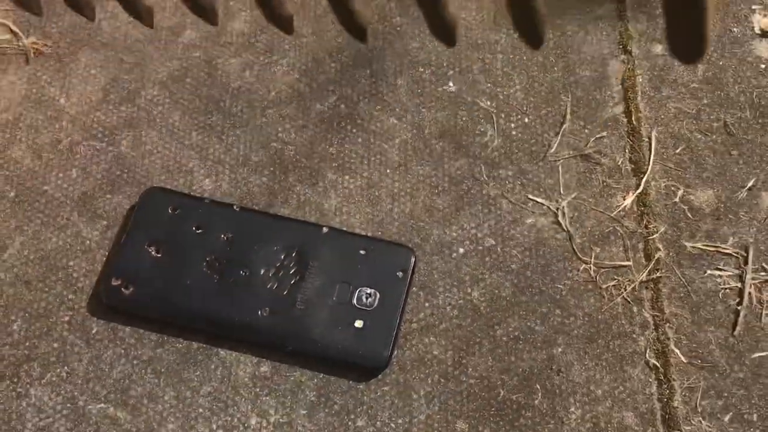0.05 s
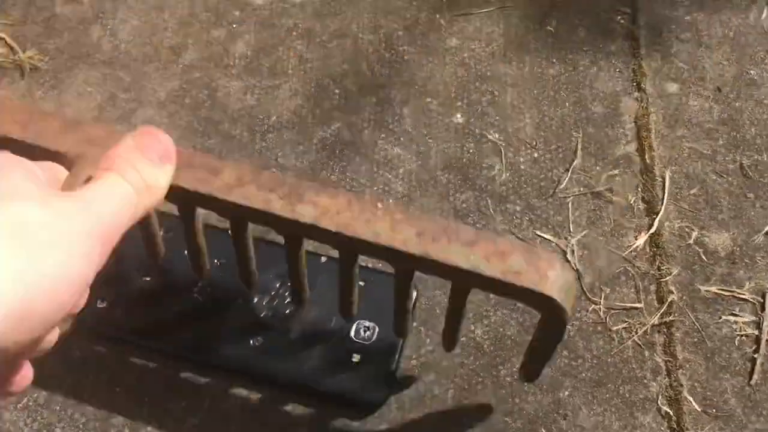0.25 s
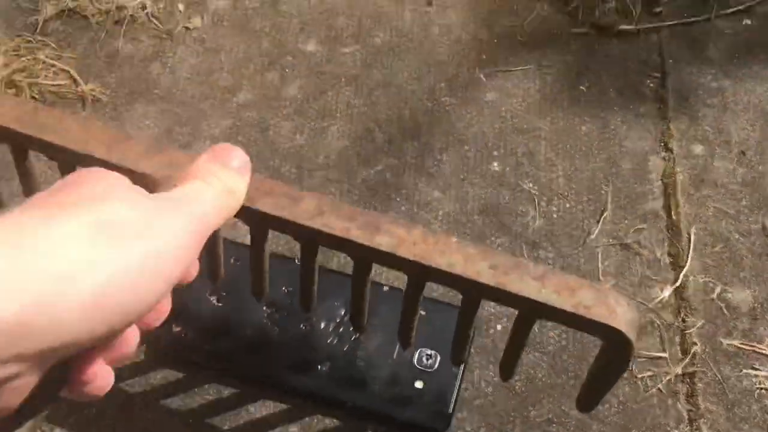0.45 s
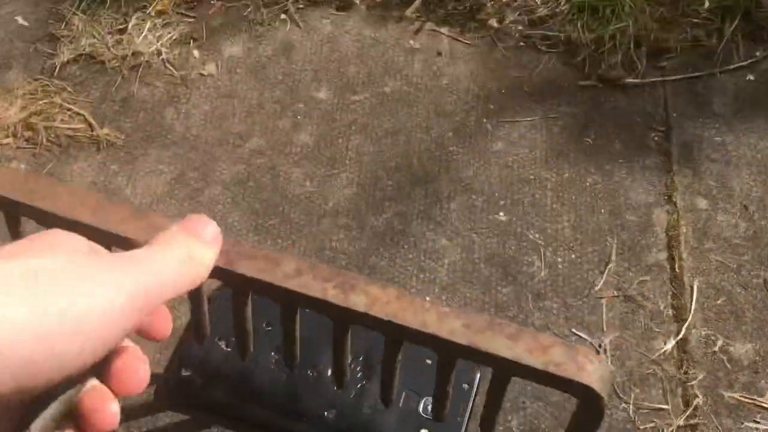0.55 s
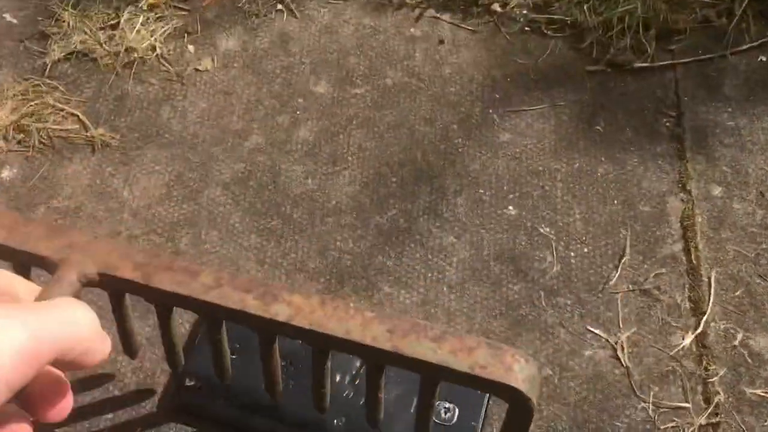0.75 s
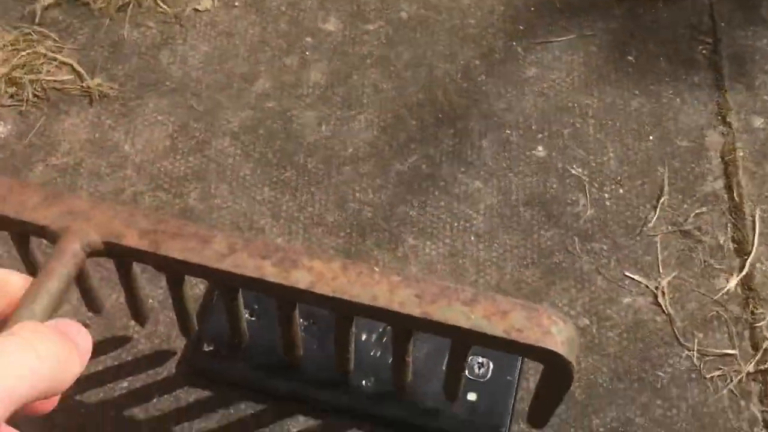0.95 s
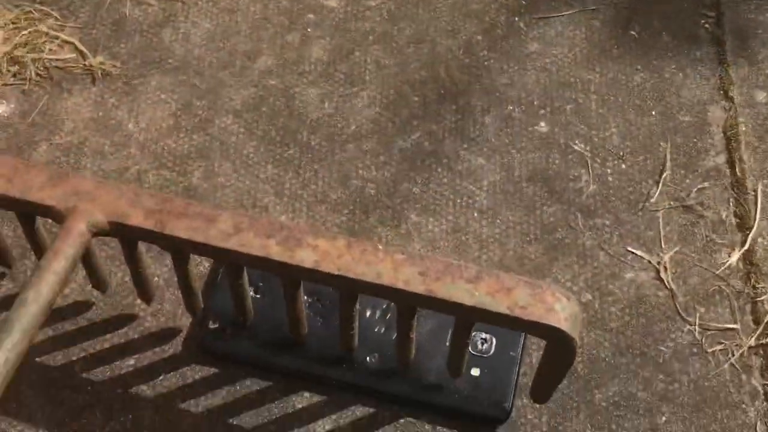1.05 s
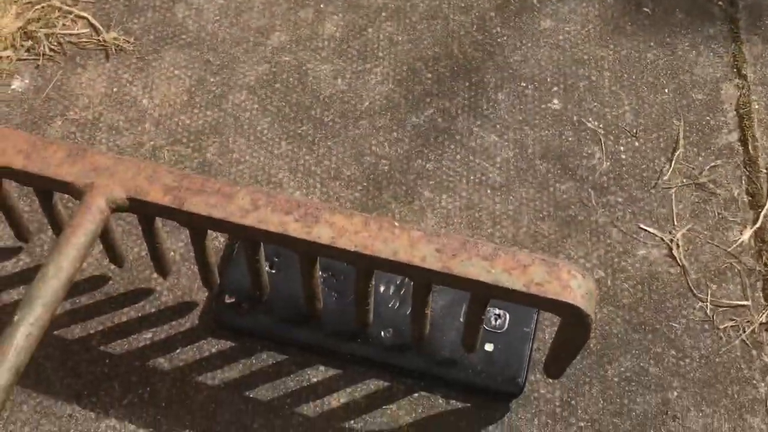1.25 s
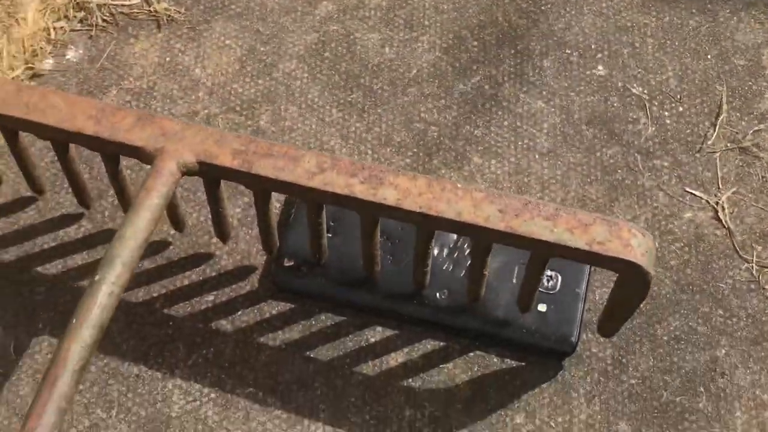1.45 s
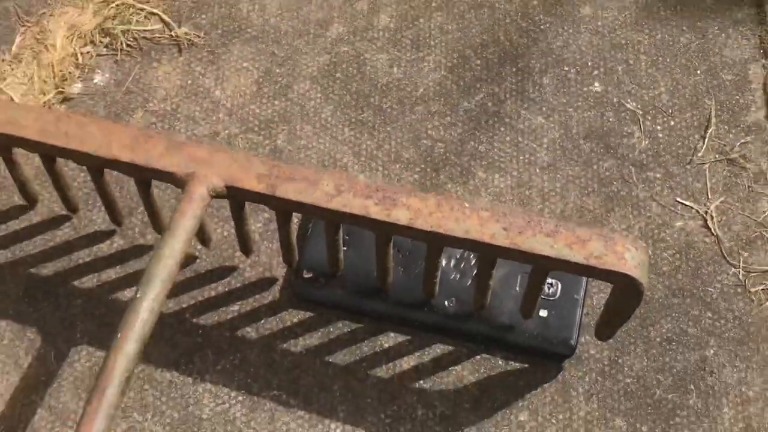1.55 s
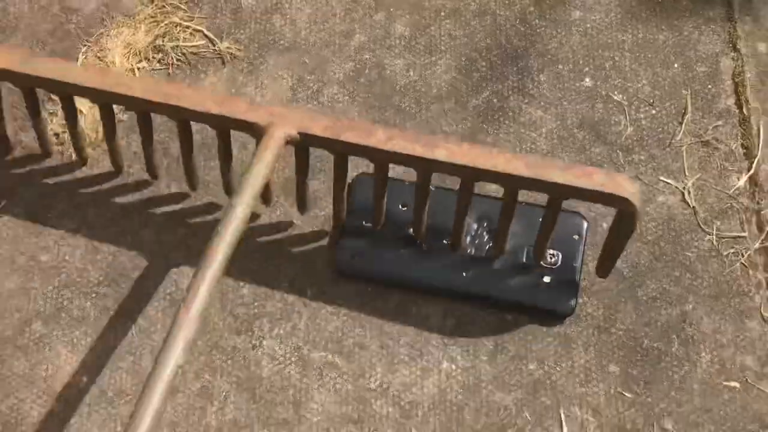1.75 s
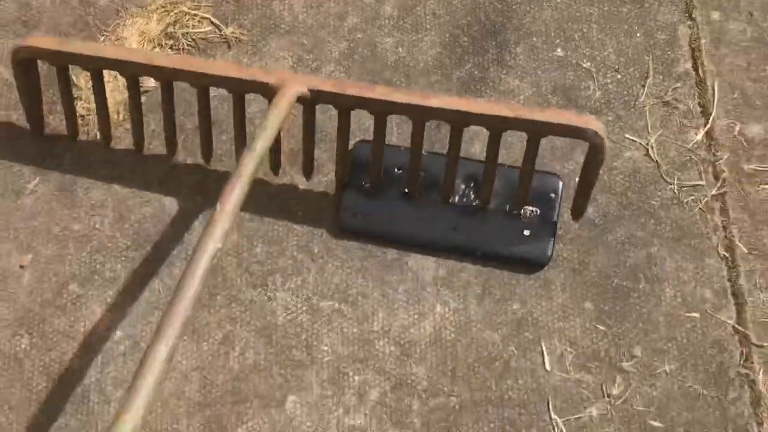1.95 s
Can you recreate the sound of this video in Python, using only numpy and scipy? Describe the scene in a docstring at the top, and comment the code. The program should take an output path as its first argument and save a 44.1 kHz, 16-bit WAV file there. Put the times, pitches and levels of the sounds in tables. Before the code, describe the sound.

One loud rattling clank of a steel rake, followed by two gritty drags across concrete.

```python
"""Outdoors on a concrete slab: a steel garden rake is set down on a phone lying there, right at its mic.
The head lands with one loud rattling clank, then drags twice: it grinds over the rough concrete, grit
snaps under it and single tines ping as they slip off an edge. The handle bumps, the phone's case takes
two dull knocks, and the head judders in the second drag. A faint ring hangs between the drags, over a
low outdoor hum and a faint hiss."""
import sys
import numpy as np
from scipy import signal
from scipy.fft import rfft, irfft
from scipy.io import wavfile

SR = 44100
rng = np.random.default_rng(int(sys.argv[2]) if len(sys.argv) > 2 else 0)


def file_out(sig):
    """Save sig as 16-bit WAV at sys.argv[1]."""
    # one column per channel
    cols = np.atleast_2d(sig).T
    # limit, then scale
    lim = np.clip(cols, -1, 1)
    pcm = np.round(lim * 32767).astype(np.int16)
    wavfile.write(sys.argv[1], SR, pcm)


N = 88200

GRIND_PER_S, GRIND_SPREAD_DB = 5000, 5  # tiny catches of steel on concrete
# spectrum of cracking grit: f/Hz, density/dB
GRIT_SPECTRUM = [(100, -36), (1500, -4), (3000, -4.5), (5500, 0), (7500, -6), (9000, -5), (10500, -9),
                 (13000, -0.5), (16000, -8)]
# spectrum of the head in the scuff and the first drag: f/Hz, density/dB
FIRST_SPECTRUM = [(40, -27.5), (140, -7), (300, -3.5), (550, -0.5), (750, -1.5), (1100, -3.5), (1650, 0.5),
                  (2100, -14), (2800, -18.5), (3600, -28.5), (8000, -29.5), (16000, -59)]
# its resonances there: f/Hz, width/Hz, boost/dB
FIRST_RESONANCES = [(367, 13, 9.5), (556.4, 22, 13.5), (1465, 93, 8.2), (1700, 27, 6.9), (2710, 49, 17),
                    (3850, 30, 13)]


def amp(db):
    return 10 ** (np.asarray(db) / 20)


def unit_rms(x):
    return x / np.sqrt(np.mean(x ** 2) + 1e-20)


def at_hz(points, hz):
    """Interpolates a table on a log-frequency axis."""
    f, value = np.transpose(points)
    return np.interp(np.log(hz + 1), np.log(f + 1), value)


def add(mix, start_s, sound):
    part = mix[round(start_s * SR):][:len(sound)]
    part += sound[:len(part)]


def decay(t, t60):
    return np.exp(-np.log(1000) * t / np.maximum(t60, 1e-3))


def envelope(curve):
    """Gain over the scene from rows of t/s, level/dB; silent outside them."""
    s, db = np.transpose(curve)
    return amp(np.interp(np.arange(N) / SR, s, db, left=-120, right=-120))


def colour(x, spectrum, resonances=(), tilt=0, size=8192):
    """Causal filter from a spectrum, resonances and a tilt in dB/octave above 500 Hz; unit RMS out."""
    hz = abs(np.fft.fftfreq(size, 1 / SR))
    gain = amp(at_hz(spectrum, hz) + tilt * np.log2(np.maximum(hz, 500) / 2000))
    peaks = sum(amp(db) ** 2 / (1 + (2 * (hz - f) / width) ** 2) for f, width, db in resonances)
    log_gain = np.log(gain * np.sqrt(1 + peaks) + 1e-6)
    taps = np.fft.ifft(np.exp(np.conj(signal.hilbert(log_gain)))).real  # minimum phase
    return unit_rms(signal.fftconvolve(x, taps[:size // 2])[:len(x)])


def flat_noise(size=16384):
    """Noise with equal strength at every frequency."""
    return unit_rms(irfft(np.exp(2j * np.pi * rng.random(size // 2 + 1))))


def ring(modes, size=24000):
    """Dying sines of alternating sign, one for each mode."""
    t = np.arange(size) / SR
    return sum((-1) ** k * amp(db) * decay(t, t60) * np.sin(2 * np.pi * hz * t)
               for k, (hz, db, t60) in enumerate(modes))


def burst(spectrum, t60, tilt=0):
    """A short crack of coloured noise."""
    noise = colour(flat_noise(), spectrum, tilt=tilt)
    return noise * decay(np.arange(len(noise)) / SR, t60)


def grains(per_s, spread_db):
    """Random tiny impacts of uneven size."""
    size = amp(spread_db * np.minimum(rng.exponential(1, N), 4))
    return size * rng.choice([-1., 1.], N) * (rng.random(N) < per_s / SR)


def outdoors():
    """The bed behind the rake: a low wandering hum and softly swelling air."""
    # course of the hum: t/s, f/Hz, level/dB
    hum_course = [(0, 75.1, -45.5), (0.2, 72.83, -50.5), (0.35, 56, -77), (0.65, 45.48, -68),
                  (1.08, 47.36, -59.5), (1.241, 50.03, -50.5), (1.42, 53.43, -53.5), (1.9, 52.9, -48),
                  (2.0, 53.4, -66.5)]
    # open air: f/Hz, density/dB
    air_spectrum = [(20, -20), (45, -5.5), (95, 3), (170, -10.5), (380, -10.5), (700, -22.5), (1400, -17),
                    (2200, -31), (5000, -36), (10000, -44.5), (16000, -42)]
    octave_db, air_db, swell_db = -13.5, -57.5, -2.5
    t = np.arange(N) / SR
    s, hz, db = np.transpose(hum_course)
    phase = 2 * np.pi * np.cumsum(np.interp(t, s, hz)) / SR
    hum = amp(np.interp(t, s, db)) * unit_rms(np.sin(phase) + amp(octave_db) * np.sin(2 * phase))
    swell = sum(np.sin(2 * np.pi * (f * t + rng.random())) / np.sqrt(f) for f in np.geomspace(.7, 8, 20))
    air = colour(rng.standard_normal(N), air_spectrum)
    return hum + amp(air_db + swell_db * unit_rms(swell)) * air


def hiss():
    """A faint high hiss comes and goes."""
    # course of the hiss: t/s, level/dB
    course = [(0, -59), (0.08, -67), (0.18, -56.5), (0.4, -68.5), (0.89, -67), (0.97, -58), (1.11, -56),
              (1.135, -60.5), (1.16, -76.5), (1.275, -74), (1.30, -57), (1.36, -60.5), (1.45, -61.5),
              (1.5, -67.5), (1.8, -63.5), (2.0, -60)]
    # its spectrum: f/Hz, density/dB
    spectrum = [(200, -12), (900, 5.5), (1650, 8.5), (2200, 2.5), (3200, 4), (5000, -1.5), (8000, -0.5),
                (13000, 1), (16000, -2.5)]
    return envelope(course) * colour(rng.standard_normal(N), spectrum)


def grinding(course, spectrum, resonances):
    """Steel catches on rough concrete, and the tiny impacts excite the head's resonances."""
    return envelope(course) * colour(grains(GRIND_PER_S, GRIND_SPREAD_DB), spectrum, resonances)


def scuff():
    """The head brushes the slab before it lands."""
    # a light touch: t/s, level/dB
    course = [(0.0, -50.5), (0.012, -59.5), (0.03, -49.5), (0.05, -56), (0.15, -88)]
    return grinding(course, FIRST_SPECTRUM, FIRST_RESONANCES)


def grit_snaps():
    """Single bits of grit crack under the tines, close to the mic."""
    # snaps: t/s, level/dB, tilt/(dB/octave), t60/s
    snaps = [(0.010, -48, -8, 0.11), (0.1302, -49.5, -5, 0.046), (0.191, -45.5, -3, 0.026),
             (0.214, -27.5, -8.5, .025), (0.228, -37, 13, 0.013), (0.2975, -25, 9, .02),
             (0.3137, -26.5, -2.5, 0.025), (0.3357, -31.5, 0.5, .04), (0.508, -35, -7, 0.075),
             (0.5410, -30, -6, 0.023), (0.5546, -28, -4.5, 0.041), (0.5886, -28.5, -8.5, 0.022),
             (0.5950, -25.5, -6, 0.05), (0.6035, -38, 2, 0.038), (0.6536, -31.5, -6.5, 0.011),
             (0.774, -32, 7, 0.024), (0.7758, -21.5, -3.5, 0.011), (0.7803, -30, -4, 0.018),
             (0.7816, -26, -1.5, 0.0076), (0.7980, -37, 0, 0.017), (0.8083, -33, -7, 0.019),
             (0.8236, -33, -5, 0.02), (0.829, -36, -3.5, 0.006), (0.9178, -49.5, -5, .015),
             (1.4475, -49.5, -1, 0.043), (1.7005, -34, -10.5, 0.011), (1.7440, -34, 3, 0.014),
             (1.747, -34.5, -3, 0.014), (1.7640, -34.5, -6, 0.0082), (1.8370, -51, -2, 0.045),
             (1.9773, -37, -2.5, 0.01), (1.9810, -37, -1, 0.015), (1.985, -37, 5, 0.01)]
    out = np.zeros(N)
    for s, db, tilt, t60 in snaps:
        add(out, s, amp(db) * burst(GRIT_SPECTRUM, t60, tilt))
    return out


def drags():
    """Two pulls over the slab: the head grinds while grit rattles the tines."""
    # course of each drag: t/s, grinding level/dB, grit level/dB
    first_course = [(0.186, -52, -61), (0.197, -40, -51), (0.235, -38, -54), (0.29, -50, -33.5),
                    (0.33, -33.5, -47.5), (0.365, -38, -54), (0.39, -38.5, -57), (0.416, -43, -66),
                    (0.488, -34.5, -60.5), (0.533, -36, -69), (0.542, -30.5, -47), (0.578, -37, -52),
                    (0.602, -28.5, -37), (0.635, -34, -62), (0.66, -32.5, -60), (0.695, -38.5, -60),
                    (0.75, -57, -70), (0.805, -41.5, -50), (0.86, -56, -62.5)]
    second_course = [(1.535, -71, -73), (1.556, -54, -64), (1.585, -62, -63), (1.594, -37, -51),
                     (1.63, -37, -48), (1.66, -38.5, -47), (1.678, -36.5, -55), (1.708, -40.5, -54),
                     (1.738, -40.5, -47.5), (1.776, -51, -61), (1.86, -72, -72), (2.0, -56.5, -60)]
    # spectrum of the head in the second drag: f/Hz, density/dB
    second_spectrum = [(40, -30.5), (170, 2), (430, -9.5), (750, -5.5), (1150, -2.5), (1400, -2.5),
                       (1850, 1.5), (2400, -9.5), (3400, -24.5), (8000, -37), (16000, -63.5)]
    # its resonances there, then those of the tines in each drag: f/Hz, width/Hz, boost/dB
    second_resonances = [(555, 12, 22.3), (1043, 11.6, 8.87), (1162.5, 14, 16.8), (1250, 12.57, 8.3),
                         (1566, 32.6, 5.3), (2080, 17.3, 5.8), (2344, 19.9, 11.53), (2980, 31.2, 18)]
    first_tines = [(3560, 40, 3.5), (4550, 60, 4.5), (5360, 90, 8.5), (5700, 130, 5), (7176, 40, 6),
                   (8755, 37, 5), (9300, 40, 5.5)]
    second_tines = [(5100, 53, 4.3), (5900, 58, 19), (7170, 50, 7.3), (7960, 60, 10), (8550, 110, 11),
                    (12600, 40, 8), (13100, 300, 5), (14220, 40, 11)]
    pulls = [(first_course, FIRST_SPECTRUM, FIRST_RESONANCES, first_tines),
             (second_course, second_spectrum, second_resonances, second_tines)]
    out = np.zeros(N)
    for course, spectrum, head_resonances, tine_resonances in pulls:
        s, grind_db, grit_db = np.transpose(course)
        out += grinding(np.c_[s, grind_db], spectrum, head_resonances)
        grit = colour(grains(per_s=4300, spread_db=7.5), GRIT_SPECTRUM, tine_resonances)
        out += envelope(np.c_[s, grit_db]) * grit
    return out


def thump():
    """A low, soft-edged push that rings the handle."""
    # the push: f/Hz, density/dB
    spectrum = [(25, -31.5), (55, 7.5), (100, -11), (150, 3), (200, -2), (240, -11.5), (340, -7.5),
                (600, -17), (2000, -41), (16000, -81.5)]
    # the handle's low modes: f/Hz, level/dB, t60/s
    handle_modes = [(55.5, -10.5, 0.15), (150.2, -3.5, .1), (186, -3, 0.13), (244, -12.5, 0.034),
                    (338.6, -7.5, 0.12)]
    noise_db, rise_s = -2.5, .003
    push = amp(noise_db) * burst(spectrum, t60=.075)
    onset = np.minimum(np.arange(len(push)) / SR / rise_s, 1)
    return (push + ring(handle_modes, size=len(push))) * onset


def clank():
    """The head lands at the mic: each blow sets off a dense clang, its main modes and a low thump."""
    # blows of the head: t/s, level/dB, tilt/(dB/octave), thump level/dB
    blows = [(0.2129, -31, -2, -56.5), (0.2367, -8, -0.5, -22), (0.2416, -15, -0.5, -25),
             (0.2507, -14, 8, -31), (0.2553, -29.5, 6.5, -10.5), (0.2595, -21, 8, -23.5),
             (0.2630, -26, 1.5, -18), (0.2850, -29, -1, -31.5), (0.381, -48, -1, -71),
             (0.5370, -31, -4, -43), (0.6031, -36, 4.5, -42.5), (0.7604, -37, -4, -35)]
    # spectrum of the clang: f/Hz, density/dB
    clang_spectrum = [(100, -11.5), (350, -4.5), (650, -8), (900, -3), (1400, 0), (2300, -1.5),
                      (3300, -7.5), (4000, -6), (6000, -14), (8500, -16.5), (10400, -22.5), (12500, -22),
                      (16000, -24.5)]
    # its decay: f/Hz, t60/s
    clang_t60 = [(200, 0.089), (1500, 0.15), (4000, 0.13), (9000, 0.099), (16000, 0.041)]
    # the head's strongest modes: f/Hz, relative level/dB, t60/s
    head_modes = [(148.5, -7.5, .2), (189, -4, 0.14), (275.8, -9.5, .2), (389, -12.5, 0.18),
                  (526.8, -7, 0.22), (1236, -7.5, .13), (1300, -6.5, 0.12), (1373, -5, 0.11),
                  (1486, -12.5, .18), (1615, -17.5, .15), (1657, -8.5, 0.086), (1797, -10, 0.083),
                  (1813, -11.5, 0.1), (2226, -2.5, 0.11), (2330, -6, 0.055), (2437, -4.5, 0.12),
                  (2770, -8, 0.12), (3085, -13, 0.097), (4102, -15, .12), (5566, -15.5, 0.065),
                  (6101, -13.5, 0.092), (8610, -12, .09)]
    # shaft and tines ringing on after the heaviest blow: f/Hz, level/dB, t60/s
    afterring_modes = [(1260, -45.5, 0.41), (1405, -42, 0.43), (1600, -40.5, 0.45), (2411, -48.5, 0.62),
                       (3000, -49.5, .55), (5660, -46, 0.34), (5814, -53, 1), (8400, -54.5, 0.66)]
    head_db, heaviest_blow_s = -4, 0.237
    out = np.zeros(N)
    for s, db, tilt, thump_db in blows:
        noise = colour(flat_noise(), clang_spectrum, tilt=tilt)
        hz, t, bands = signal.stft(noise, SR, nperseg=256)
        dying_bands = bands * decay(t, at_hz(clang_t60, hz)[:, None])
        _, clang = signal.istft(dying_bands, SR, nperseg=256)
        add(out, s, amp(db) * clang)
        add(out, s, amp(db + head_db) * ring(head_modes))
        add(out, s, amp(thump_db) * thump())
    add(out, heaviest_blow_s, ring(afterring_modes))
    return out


def handle_bumps():
    """The handle bumps softly as the rake moves."""
    # bumps: t/s, level/dB
    bumps = [(0.337, -31.5), (0.478, -45), (0.683, -41.5), (0.719, -44.5), (0.7617, -33), (1.640, -40.5),
             (1.863, -47.5), (1.973, -43.5)]
    out = np.zeros(N)
    for s, db in bumps:
        add(out, s, amp(db) * thump())
    return out


def tine_pings():
    """A tine slipping off an edge ticks and rings; the outer one is stopped when it comes to rest."""
    # slips: t/s, ring level/dB, tick level/dB, which tine
    slips = [(0.594, -51.5, -59, "outer"), (0.6828, -62, -45.5, "outer"), (0.718, -51, -44.5, "outer"),
             (0.7627, -43, -53, "outer"), (0.7772, -45, -49, "outer"), (1.5764, -51.5, -56, "inner"),
             (1.5895, -33, -36, "inner"), (1.6235, -40, -33, "inner"), (1.666, -45.5, -50, "inner"),
             (1.6869, -45, -42, "inner"), (1.7043, -43.5, -37, "inner"), (1.8960, -66, -47, "inner")]
    # modes of the outer and the inner tine: f/Hz, relative level/dB, t60/s
    tine_modes = {"outer": [(1500, -3.5, .25), (5550, -18, .15), (6650, -21, .25), (8730, 1, 0.48),
                  (9650, -4, 0.17), (14255, -13, 0.18)], "inner": [(5706, -11, 0.16), (5823, -3, 0.13),
                  (7210, -13, 0.14), (7962, -6, 0.14), (8360, -9, 0.3), (8410, 4, 0.043), (9100, -11, .18),
                  (12597, -13, 0.16), (12800, -15, 0.071), (13189, -4.5, .08), (14061, -10, 0.13),
                  (14223, -25.5, 0.26), (14556, -11.5, .18)]}
    # a tine's tick: f/Hz, density/dB
    tick_spectrum = [(200, -25), (1500, 15.5), (2800, 0.5), (4000, 0), (6000, -0.5), (8400, 6),
                     (10800, -5.5), (13100, 1), (16000, -7)]
    rest_s = 0.820
    tines = {name: np.zeros(N) for name in tine_modes}
    for s, ring_db, tick_db, name in slips:
        add(tines[name], s, amp(ring_db) * ring(tine_modes[name]))
        add(tines[name], s, amp(tick_db) * burst(tick_spectrum, t60=.065))
    since_rest = np.maximum(np.arange(N) / SR - rest_s, 0)
    return tines["inner"] + tines["outer"] * decay(since_rest, t60=0.054)


def lingering_ring():
    """Faint narrow tones swell and die away late in each drag and between the two."""
    # tones: start/s, end/s, f/Hz, width/Hz, level/dB, rise/s, fall/s
    tones = [(0.85, 1.575, 1497, 0.87, -54.5, 0.0073, 0.68), (0.902, 1.514, 1215, 107, -61, 0.058, 0.15),
             (1.72, 1.887, 1400, 4.3, -49, 0.034, 0.16), (0.71, 0.84, 1700, 4.9, -48.5, 0.015, 0.047)]
    t, hz = np.arange(N) / SR, np.fft.rfftfreq(N, 1 / SR)
    out = np.zeros(N)
    for start, end, f, width, db, rise, fall in tones:
        drift = np.cumsum(rng.standard_normal(N)) * np.sqrt(2 * np.pi * abs(width) / SR)
        wavering = np.sin(2 * np.pi * f * t + drift)
        tone = irfft(rfft(wavering) / (1 + ((hz - f) / 150) ** 4), N)  # trims the skirts beyond 150 Hz
        swell = np.clip((t - start) / rise, 0, 1) * np.clip((end - t) / fall, 0, 1)
        out += amp(db) * unit_rms(tone) * swell
    return out


def case_knocks():
    """Dull knocks ring the phone's case, right around the mic."""
    # knocks: t/s, level/dB
    knocks = [(0.7753, -28.5), (1.4506, -34)]
    # modes of the case: f/Hz, relative level/dB, t60/s
    case_modes = [(210, -5, 0.035), (326, -11, 0.036), (910, -1, 0.019), (1200, -6.5, 0.014),
                  (1706, -7.5, 0.035)]
    out = np.zeros(N)
    for s, db in knocks:
        add(out, s, amp(db) * ring(case_modes))
    return out


def judder():
    """Late in the second drag, stick and slip makes the head sing in a few close modes."""
    # course of the judder: t/s, level/dB
    course = [(1.61, -63), (1.635, -43), (1.66, -38.5), (1.673, -35), (1.705, -31.5), (1.735, -54.5),
              (1.79, -71)]
    # its spectrum: f/Hz, density/dB
    spectrum = [(100, -39.5), (1200, -16), (1600, 0), (2150, 0), (2800, -19.5), (16000, -57.5)]
    # the singing modes: f/Hz, width/Hz, boost/dB
    resonances = [(1596, 12, 26), (1736, 10, 19), (1709, 14, 12), (1810, 20, 17.5), (1905, 16, 10.5),
                  (2060, 14, 27.5)]
    return grinding(course, spectrum, resonances)


def scene():
    """The close rake over the outdoor bed, in mono."""
    scraping = scuff() + drags() + judder()
    impacts = clank() + grit_snaps() + handle_bumps() + case_knocks()
    return (scraping + impacts + tine_pings() + lingering_ring() + outdoors() + hiss())[None]


def record(dry):
    """The phone's mic rounds off the loudest peaks, and the top of the treble is cut."""
    rounded = dry / (1 + dry ** 6) ** (1 / 6)
    lowpass = signal.firwin(511, cutoff=15780, window=("kaiser", 9), fs=SR)
    return signal.oaconvolve(rounded, lowpass[None], "same")


dry = scene()
out = record(dry)
file_out(out)
```